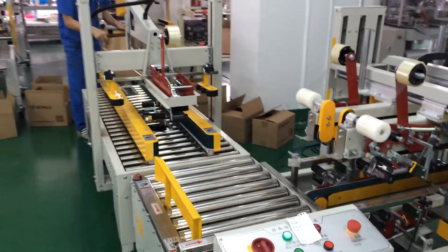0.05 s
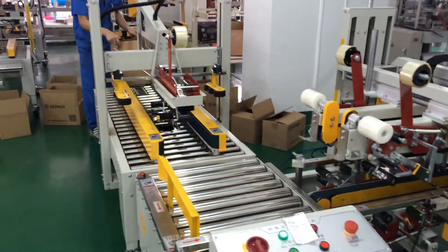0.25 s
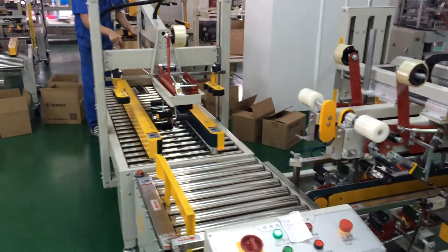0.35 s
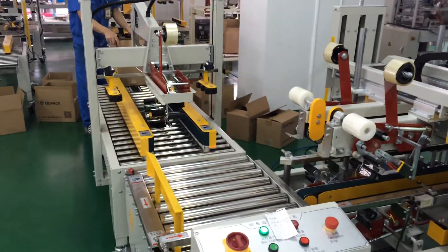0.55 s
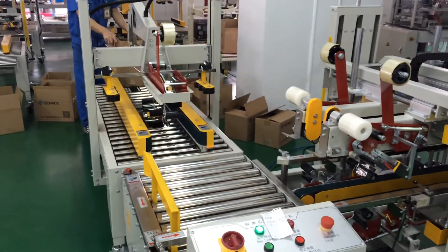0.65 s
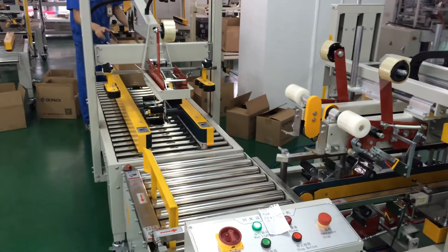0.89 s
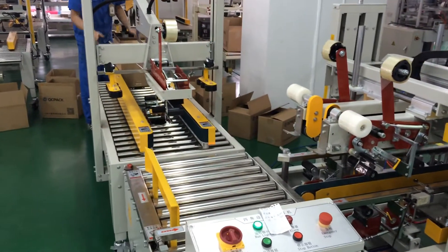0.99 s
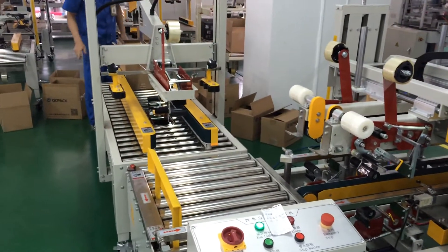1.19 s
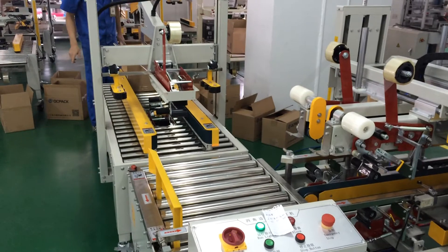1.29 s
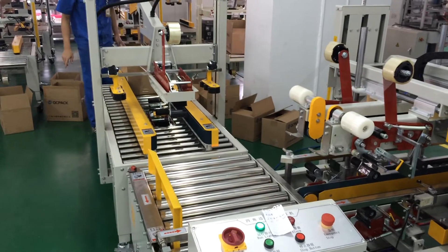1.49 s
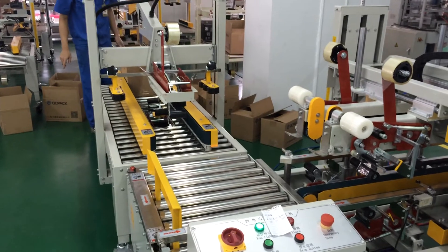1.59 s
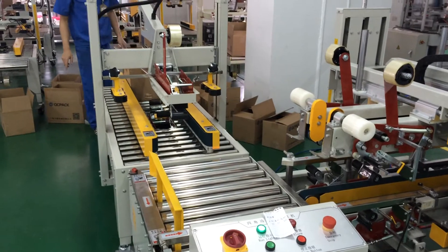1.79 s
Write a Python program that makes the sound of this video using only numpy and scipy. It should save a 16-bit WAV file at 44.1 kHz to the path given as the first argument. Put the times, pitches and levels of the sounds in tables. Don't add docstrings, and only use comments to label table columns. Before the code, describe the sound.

A carton sealing machine gives a heavy, booming double metal blow at about 0.25 s, with dull knocks tumbling after it until 0.9 s. Weak air hiss begins near 0.6 s; a sharp valve puff bursts at 1.0 s and fades by 1.3 s, with a faint rising moan. Soft clatter continues, a low motor hum starts near 1.5 s, then a faint leak hiss. Long hall echo, distant machinery rumble.

```python
import sys
import numpy as np
from scipy import signal
from scipy.fft import rfft, irfft
from scipy.io import wavfile
from scipy.ndimage import uniform_filter1d

SR = 44100
rng = np.random.default_rng(int(sys.argv[2]) if len(sys.argv) > 2 else 0)


def wav_out(sig):
    wavfile.write(sys.argv[1], SR, np.round(np.clip(np.atleast_2d(sig).T, -1, 1) * 32767).astype(np.int16))


def magnitude_from_level(level_db):
    exponent = np.asarray(level_db, float) / 20
    return 10 ** exponent


N = 81585
T = np.arange(N) / SR


def unit(x):
    return x / np.sqrt(np.mean(x ** 2))


def read(table, hz):
    table_hz, values = np.array(table).T
    return np.interp(np.log(hz + 1), np.log(table_hz), values)


def band(x, hz, width_hz):
    return signal.lfilter(*signal.iirpeak(hz, hz / width_hz, fs=SR), x)


def coloured(table):
    hz = np.arange(N // 2 + 1) * SR / N
    gain = magnitude_from_level(read(table, hz)) / (1 + (table[0][0] / (hz + 1)) ** 4)
    return unit(irfft(rfft(rng.standard_normal(N)) * gain, N))


def walk(rate):
    hold = int(SR / rate)
    steps = np.repeat(rng.standard_normal(N // hold + 1), hold)
    return 1.244 * uniform_filter1d(uniform_filter1d(steps, hold), hold)[:N]


def burst(start, rise, decay):
    since = np.maximum(T - start, 0)
    return (1 - np.exp(-since / rise)) * np.exp(-since / decay)


# (time [s], level [dB], favoured pitch [Hz], contact time [s])
BLOWS = [(0.096, -26, 106.5, 0.002), (.116, -23, 205, 0.0021), (0.243, 2, 154, 0.00086),
         (0.2574, 4.5, 258.7, 0.00051), (0.277, -5.5, 91, 0.0063), (.305, -14.5, 200, 0.0029),
         (.34, -6.5, 231, 0.0028), (.375, -9, 215, 0.0019), (.425, -7.5, 115, 0.005),
         (0.441, -9, 215, 0.0026), (0.517, -6, 222, 0.0052), (0.576, -14, 91, 0.0023),
         (0.623, -17.5, 240, 0.0012), (0.664, -11, 213, 0.0024), (0.688, -15.5, 115, 0.0017),
         (.761, -12, 255, 0.002), (.765, -20, 369, 0.00095), (.626, -18.5, 438, 0.0011),
         (.645, -16.5, 114, 0.0033), (0.829, -20.5, 89, 0.0027), (.891, -18.5, 236, 0.0025),
         (0.99, -17, 240, 0.0022), (1.004, -14.5, 230, 0.0014), (1.135, -19.5, 152, 0.0034),
         (1.229, -21.5, 100, 0.0029), (1.725, -18, 93, 0.0084), (1.791, -20, 96, 0.0074)]
# (pitch [Hz], level [dB], time to fall 60 dB [s])
FRAME_MODES = [(91.5, -3, 0.31), (111.6, 1, .2), (130.6, 0.5, 0.23), (156.1, 1, 0.12), (195.5, -9, 0.17),
               (215, 0.5, 0.17), (243.9, -2, .2), (259.6, -4.5, 0.14), (325.5, 3, 0.14), (411, -1, 0.16),
               (456.6, 5, 0.1), (601, 0, 0.088), (804, 3, 0.056), (1220, -5, 0.013)]
FAVOUR_DB_OCT, FAVOUR_MAX_DB = 31.5, 16.5
SWELL_S = 0.0032


def blows():
    boom = 0
    chance = rng.standard_normal((len(BLOWS), len(FRAME_MODES)))
    for (start, db, favour_hz, contact), luck in zip(BLOWS, chance):
        since = np.maximum(T - start, 0)
        ring = 0
        for (hz, mode_db, t60), r in zip(FRAME_MODES, luck):
            loss_db = min(FAVOUR_DB_OCT * abs(np.log2(hz / favour_hz)), FAVOUR_MAX_DB)
            tone = np.sin(2 * np.pi * hz * (1 + 0.007 * r) * since)
            ring = ring - magnitude_from_level(mode_db + 2.4 * r - loss_db) * tone * np.exp(-np.log(1000) * since / t60)
        ring = ring * (1 - np.exp(-since / SWELL_S))
        push = np.hanning(int(contact * SR) + 3)
        boom = boom + magnitude_from_level(db - 5) * signal.fftconvolve(ring, push / push.sum())[:N]
    return boom


# (pitch [Hz], level [dB])
TICK_MODES = [(1100, -1), (2000, -3), (2900, 1), (4500, -7.5), (6500, 5.5), (8400, 5), (10500, -1.5),
              (13500, -7)]
TICK_TIMES = [.2430, .2575, .7608, .9925, .078]
# (level [dB], tilt [dB per octave])
TICKS = [
    (-29.5, -3.5),
    (-34.5, -11),
    (-50, -11),
    (-44, -2),
    (-73, 10.5),
]
TICK_S, TICK_TAIL_S, TICK_TAIL_DB = 0.001, 0.0068, -7.5


def ticks():
    hiss, out = rng.standard_normal(N), 0
    for hz, mode_db in TICK_MODES:
        rattle = unit(band(band(hiss, hz, hz / 2), hz, hz / 2))
        for start, (db, tilt_db) in zip(TICK_TIMES, TICKS):
            ring = 3 * np.sin(2 * np.pi * hz * (T - start)) * burst(start, TICK_S / 2, TICK_S)
            tail = magnitude_from_level(TICK_TAIL_DB) * rattle * burst(start, TICK_S, TICK_TAIL_S)
            out = out + magnitude_from_level(db + mode_db + tilt_db * np.log2(hz / 4000)) * (ring + tail)
    return out


# (opening time [s], puff level [dB], puff decay [s], flow level [dB], shutting time [s])
VENTS = [
    (0.602, -37.5, 0.039, -52.5, .9),
    (.68, -78, 0.027, -48, 1.2),
    (.992, -38.5, 0.03, -35.5, 1.01),
    (1.006, -27.5, 0.02, -30.5, 1.27),
]
VENT_RISE = [0.0047, 0.032, .001, 0.0035]
VENT_SAG = [-4, -10, 4, -32]
VENT_CLOSE = [0.0297, 0.034, 0.021, 0.046]
# (frequency [Hz], level [dB per Hz])
JETS = [
    [(880, -39), (1500, -20.5), (2500, -4), (3550, -13), (5800, -17), (6520, -12.5), (14700, -26),
     (15600, -28)],
    [(1060, -13), (1800, 1), (1880, 10), (2020, -1), (3010, 0.5), (5990, 2.5), (6440, -5), (15600, -38)],
    [(710, -25), (1200, -1), (1970, 3.5), (6070, -8.5), (11800, -8), (15600, -20)],
    [(710, 0.5), (1200, -8.5), (2010, -3.5), (2310, -7.5), (2540, -4), (4840, 0), (8280, -7.5), (10500, -9),
     (15600, -22)],
]
# (centre [Hz], width [Hz], level [dB])
MUFFLER = [(1700, 400, 0), (3900, 1200, 4), (6450, 500, 4)]
MUFFLER_SHARE = [.2, 0, .5, 1.1]


def air():
    out = 0
    settings = zip(VENTS, VENT_RISE, VENT_SAG, VENT_CLOSE, JETS, MUFFLER_SHARE)
    for (start, puff_db, decay, flow_db, shut), rise, sag_db, close, jet, share in settings:
        noise = coloured(jet)
        muffled = sum(magnitude_from_level(db) * band(noise, hz, width) for hz, width, db in MUFFLER)
        puff = magnitude_from_level(puff_db) * burst(start, rise, decay) * (noise + share * muffled)
        flow = burst(start, rise, 1e3) * magnitude_from_level(flow_db + sag_db * (T - start))
        flow = flow * np.exp(-np.maximum(T - shut, 0) / close)
        out = out + (puff + flow * noise) * magnitude_from_level(walk(58.1))
    return out


# (time [s], level [dB], centre [Hz], decay [s])
CLATTER = [(0.088, -41.5, 744, 0.18), (0.253, -30, 1070, 0.0058), (0.264, -33.5, 930, 0.038),
           (0.61, -35.5, 2430, 0.016), (0.627, -31, 890, 0.025), (0.762, -32.5, 740, 0.04),
           (0.922, -36.5, 926, 0.14), (1.049, -38, 740, 0.26), (1.318, -31, 760, 0.066),
           (1.33, -42, 1565, 0.098), (1.456, -36, 698, 0.031), (1.551, -45, 940, 0.048)]
CLATTER_PER_S, CLATTER_RISE_S = 2500, 0.006


def clatter():
    out = 0
    for start, db, hz, decay in CLATTER:
        clicks = (rng.random(N) < CLATTER_PER_S / SR) * rng.standard_normal(N)
        rattle = unit(band(band(clicks, hz, hz * 1.3), hz, hz * 1.3))
        out = out + magnitude_from_level(db) * burst(start, CLATTER_RISE_S, decay) * rattle
    return out


# (time [s], pitch [Hz], level [dB])
STROKE = [
    (1.03, 270, -44),
    (1.062, 284, -36),
    (1.112, 343, -35),
    (1.198, 360, -46),
    (1.298, 342, -45.5),
]


def stroke():
    times, hz, db = np.array(STROKE).T
    pitch = np.interp(T, times, hz) * (1 + 0.05 * walk(45))
    level_db = np.interp(T, times, db, left=-99, right=-99) + 1.8 * walk(31.1)
    return np.sin(2 * np.pi * np.cumsum(pitch) / SR) * magnitude_from_level(level_db)


# (multiple of the motor's pitch [count], level [dB])
MOTOR_LINES = [(1, -44), (2, -38)]
MOTOR_HZ, MOTOR_ON_S, MOTOR_RISE_S, MOTOR_SAG_DB_S = 86.15, 1.47, 0.015, -17


def motor():
    phase = 2 * np.pi * np.cumsum(MOTOR_HZ * (1 + 0.0031 * walk(8.1))) / SR
    since = T - MOTOR_ON_S
    on = magnitude_from_level(MOTOR_SAG_DB_S * since) / (1 + np.exp(-since / MOTOR_RISE_S))
    return on * sum(magnitude_from_level(db + 3 + 1.2 * walk(8)) * np.sin(k * phase) for k, db in MOTOR_LINES)


def leak():
    centre_hz, width_hz = 7860, 7000
    hiss = unit(band(band(rng.standard_normal(N), centre_hz, width_hz), centre_hz, width_hz))
    return magnitude_from_level(-64.5) * burst(1.58, 0.03, 1e3) * hiss


def rumble():
    return magnitude_from_level(-48.5 + 1.19 * walk(10.27)) * unit(band(rng.standard_normal(N), 95.6, 12))


# (frequency [Hz], level [dB per Hz])
FLOOR = [(60, -59), (110, -11.5), (200, -6), (500, -15), (1200, -15.5), (2500, -26), (6000, -35.5),
         (15000, -61)]
FLOOR_DB = -43.5


def far_machines():
    noise, out = coloured(FLOOR), 0
    for hz in 30 * 2 ** (np.arange(19) / 2):
        out = out + band(noise, hz, hz / 2) * magnitude_from_level(1.7 * walk(9))
    return magnitude_from_level(FLOOR_DB) * unit(out)


# (frequency [Hz], time to fall 60 dB [s])
HALL_T60 = [(90, 2.3), (240, 2), (500, 1.03), (1500, 1.22), (5000, 0.61), (12000, 0.13)]
HALL_GAP_S = 0.014


def hall(x):
    noise, tail = rng.standard_normal(N), 0
    for hz in 50 * 2 ** (np.arange(17) / 2):
        t60 = read(HALL_T60, hz)
        fade = burst(HALL_GAP_S / 2, HALL_GAP_S, t60 / np.log(1000))
        tail = tail + band(noise, hz, hz / 3) * fade / np.sqrt(t60)
    return signal.fftconvolve(x, tail / np.sqrt(np.sum(tail ** 2)))[:N]


def scene():
    boom, tick = blows(), ticks()
    hiss = air() + clatter() + stroke()
    wet = hall(magnitude_from_level(-12) * boom + magnitude_from_level(-6) * hiss + magnitude_from_level(-20) * tick)
    background = motor() + leak() + rumble() + far_machines()
    return (boom + tick + hiss + wet + background)[None]


def low_pass(x):
    return signal.sosfilt(signal.butter(12, 15750, fs=SR, output="sos"), x)


MIC_LOW_HZ, TOP_HZ = 56, 15500
AGC_TOP_DB, AGC_SLOPE, AGC_RELEASE_S = -23, 0.079, 0.083


def record(dry):
    x = signal.sosfilt(signal.butter(2, MIC_LOW_HZ, "high", fs=SR, output="sos"), dry)
    keep = np.exp(-1 / (AGC_RELEASE_S * SR))
    power = signal.lfilter([1 - keep], [1, -keep], x ** 2)
    x = x * (1 + power / magnitude_from_level(2 * AGC_TOP_DB)) ** (-AGC_SLOPE / 2)
    x = np.tanh(0.8 * x) / 0.8
    mix = signal.sosfilt(signal.ellip(10, 0.2, 90, TOP_HZ, fs=SR, output="sos"), x)
    return low_pass(mix)


dry = scene()
out = record(dry)
wav_out(out)
```